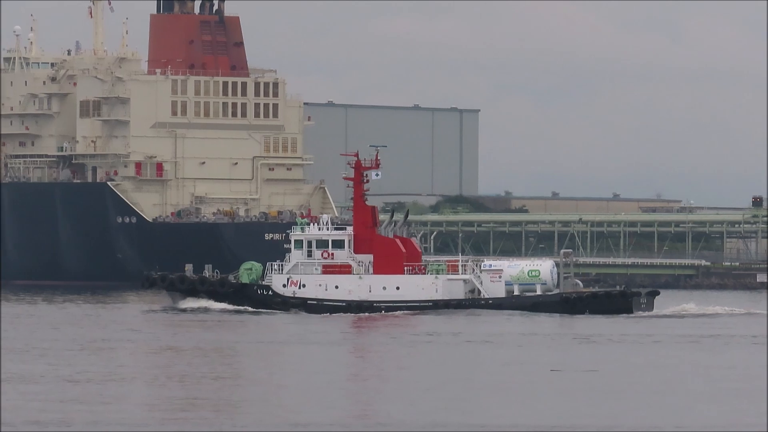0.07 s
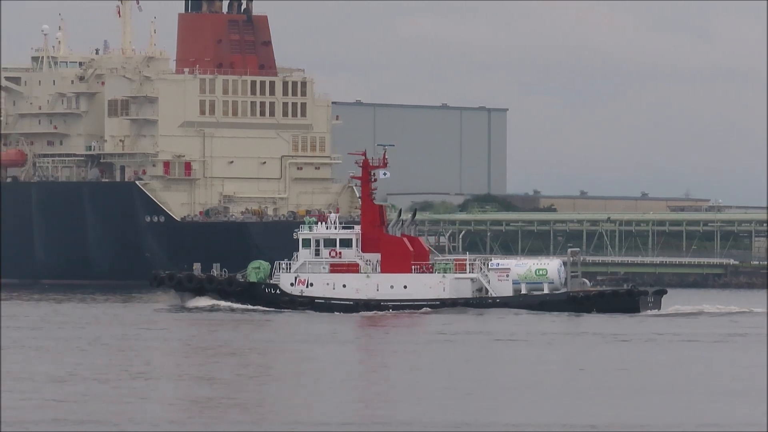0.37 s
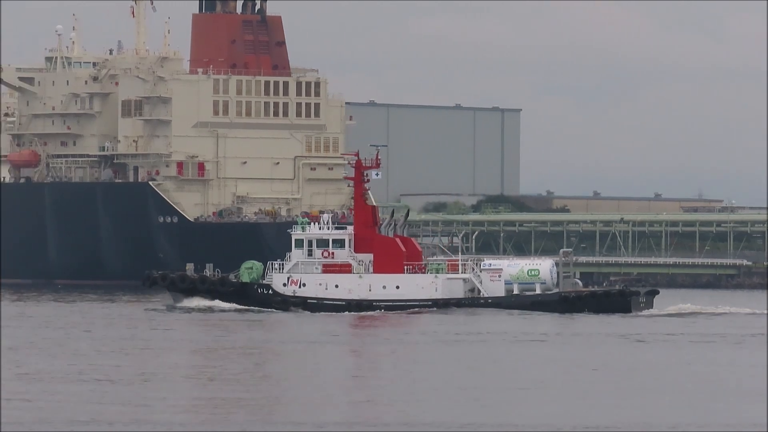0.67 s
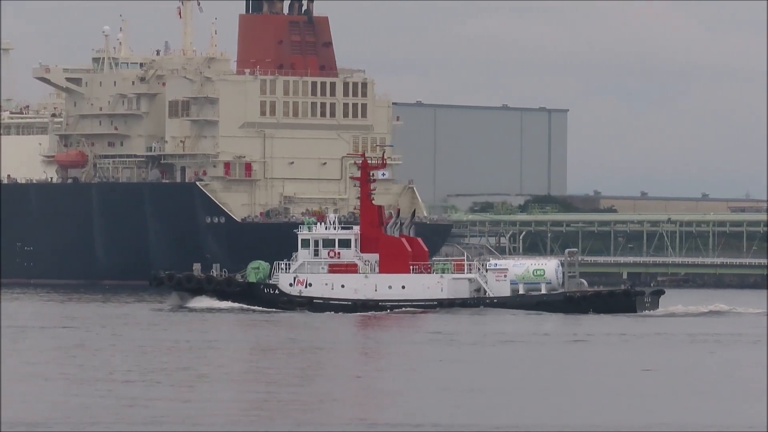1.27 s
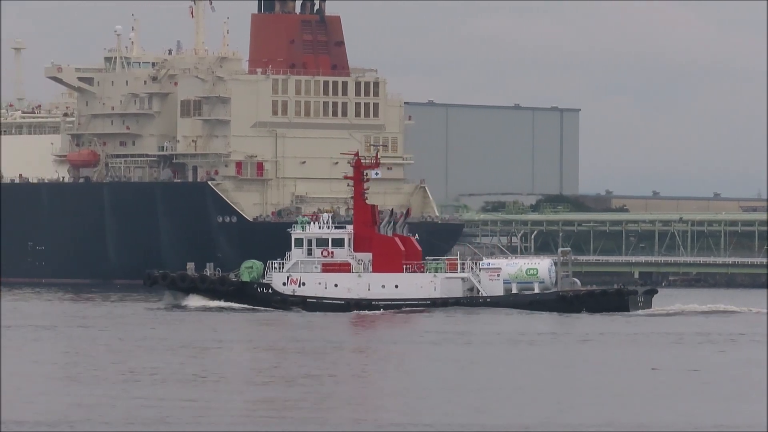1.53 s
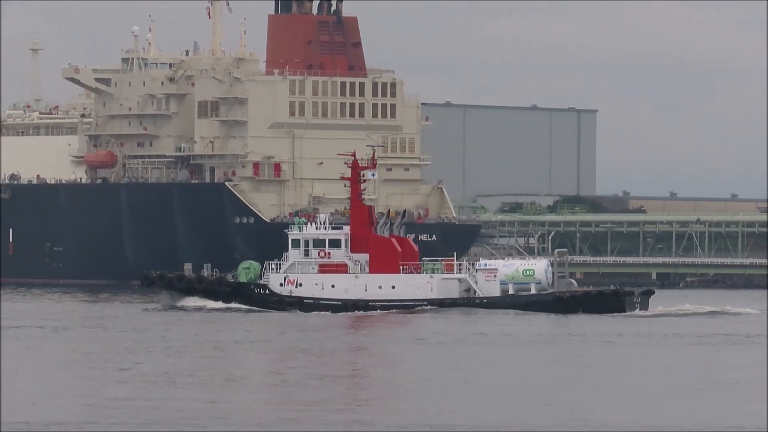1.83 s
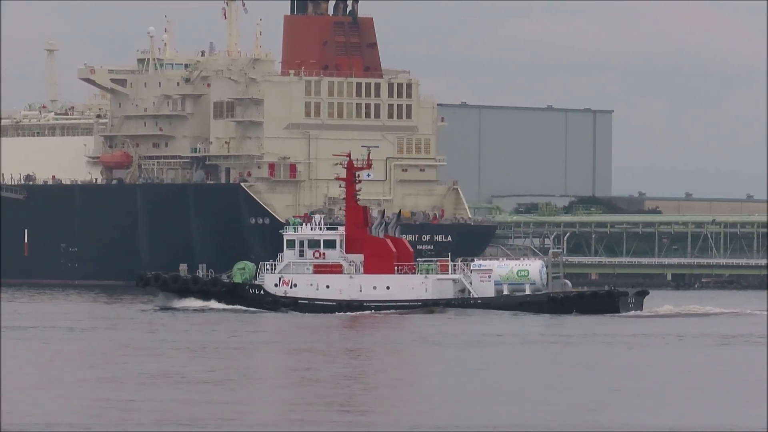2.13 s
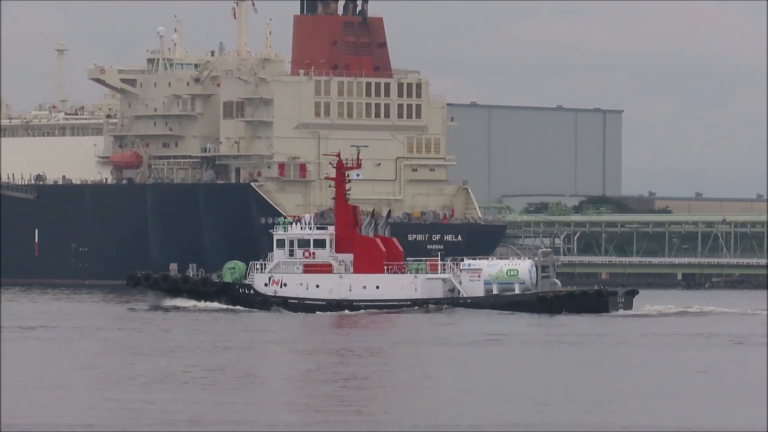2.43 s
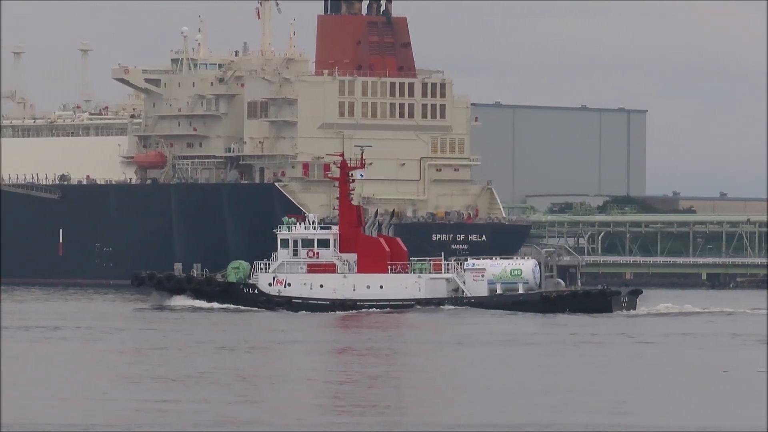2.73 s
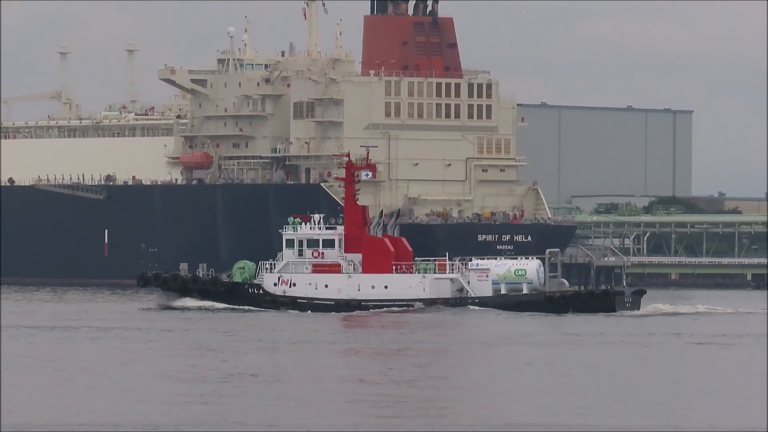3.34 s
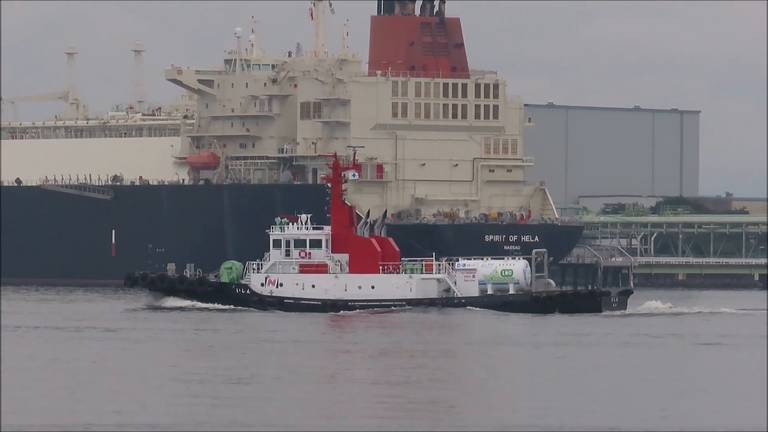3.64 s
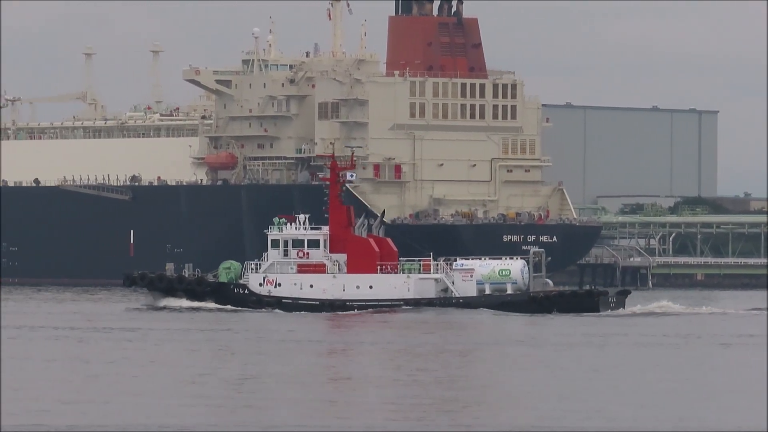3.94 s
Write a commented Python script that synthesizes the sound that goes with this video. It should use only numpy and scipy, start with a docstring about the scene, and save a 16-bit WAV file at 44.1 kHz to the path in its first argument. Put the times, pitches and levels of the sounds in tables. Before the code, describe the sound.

A distant tugboat's diesel engines rumble and drone throughout, with a slow pulse, loudest in the first 1.5 seconds and then gradually easing. Soft wind and water hiss fades along with them. Nearby wavelets plop and splash, mostly in the first second and again around 3.3 seconds. Small birds trill faintly until about 1.1 seconds and again near 3.7, with thin peeps in between.

```python
"""A tug crosses a harbour far away: its diesels rumble and drone, and its twin exhausts, slightly
out of tune, beat slowly against each other. Wind and the wash of the port hiss behind it, and
everything slowly eases off. At the near bank, wavelets plop (ringing bubbles) and splash (short
bursts of noise), and small birds chirp faintly in falling whistles."""
import sys
import numpy as np
from scipy import signal
from scipy.fft import rfft, irfft, next_fast_len
from scipy.io import wavfile
from scipy.ndimage import uniform_filter1d, map_coordinates

SR = 44100
rng = np.random.default_rng(int(sys.argv[2]) if len(sys.argv) > 2 else 0)


def to_wav(s):
    """Save 16-bit WAV."""
    ch = np.atleast_2d(s).T  # columns
    pcm = np.round(np.clip(ch, -1, 1) * 32767)  # PCM
    wavfile.write(sys.argv[1], SR, pcm.astype(np.int16))


N = 176400


def amp(db):
    """Turn decibels into a gain."""
    return 10 ** (np.asarray(db) / 20)


def unit(x):
    """Scale a sound to an average (rms) level of 1."""
    return x / np.sqrt(np.mean(x ** 2) + 1e-20)


def along(points, hz):
    """Read between (frequency [Hz], value) points on a log frequency axis."""
    freqs, values = np.transpose(points)
    return np.interp(np.log(hz + 1), np.log(freqs + 1), values)


def curve(rows):
    """Join (time [s], value) points with straight lines, one value per sample."""
    return np.interp(np.arange(N) / SR, *np.transpose(rows))


def wobble(rate):
    """A smooth curve through `rate` random values a second."""
    return map_coordinates(rng.standard_normal(512), [np.arange(N) * rate / SR + 2], mode="wrap")


def filtered(x, response):
    """Give each frequency in x the gain response(hz)."""
    size = next_fast_len(N + SR // 2)
    return irfft(rfft(x, size) * response(np.fft.rfftfreq(size, 1 / SR)), size)[..., :N]


def rush(spectrum, patchy_db):
    """Stereo noise with random louder and softer patches, mono in the bass and wide in the treble."""
    # how alike left and right are (frequency [Hz], likeness [0 to 1])
    likeness = [(100, 1), (180, .99), (350, 0.93), (700, 0.95), (1400, 0.81), (2800, 0.45), (5600, 0.29),
                (11000, 0.032)]
    bands = signal.stft(rng.standard_normal((2, N)), nperseg=512)[2]
    patches = uniform_filter1d(rng.standard_normal(bands.shape[1:]), size=5, axis=0)
    patches = uniform_filter1d(patches, size=10, axis=1)
    pair = signal.istft(bands * amp(patchy_db * unit(patches)), nperseg=512)[1][:, :N]

    def mid_side_gains(hz):
        angle = np.arccos(np.clip(along(likeness, hz), -1, 1)) / 2
        return amp(along(spectrum, hz)) * [np.cos(angle), np.sin(angle)]

    mid, side = filtered(pair, mid_side_gains)
    return unit(np.array([mid + side, mid - side]))


def add(out, start, sound, pan_db=0):
    """Mix a sound in at `start` seconds, leaning left by pan_db."""
    i = max(0, round(start * SR))
    part = out[:, i:i + sound.shape[-1]]
    part += (sound * amp([[pan_db / 2], [-pan_db / 2]]))[:, :part.shape[1]]


def whistles(notes, fall_hz, length_s):
    """A bird's short falling whistles, with a faint echo from the quay."""
    echo_db, echo_fade_s = -8, .25
    out, progress = np.zeros((2, N)), np.linspace(0, 1, int(length_s * SR))
    for start, top_hz, db in notes:
        phase = 2 * np.pi * np.cumsum(top_hz - fall_hz * progress) / SR
        add(out, start, amp(db) * np.sin(np.pi * progress) ** 2 * np.sin(phase))
    tail = rng.standard_normal((2, SR // 2)) * amp(-60 * np.arange(SR // 2) / SR / echo_fade_s)
    echo = signal.fftconvolve(out, tail / np.linalg.norm(tail[0]), axes=1)[:, :N]
    return out + amp(echo_db) * echo


def birds():
    """One bird trills, one gives thin peeps, and more twitter farther off."""
    # the two nearer birds' notes (time [s], starting pitch [Hz], peak level [dB])
    trill = [(.003, 4080, -56.5), (.07, 4050, -59), (.142, 4000, -59), (.215, 4000, -68), (.295, 3950, -69),
             (.39, 3850, -64), (.43, 3950, -62), (.635, 3900, -68), (.71, 4100, -65), (.77, 4080, -66),
             (.843, 4100, -61), (.91, 4120, -64), (.978, 4150, -63.5), (1.045, 4100, -62),
             (1.08, 3950, -66), (3.688, 4040, -67), (3.762, 4060, -65), (3.832, 4070, -63.5),
             (3.903, 4070, -62.5), (3.97, 4070, -63)]
    peeps = [(.132, 6270, -66), (.255, 6480, -70), (.58, 6300, -65), (.69, 6520, -70), (1.036, 6320, -68),
             (1.135, 6450, -71), (1.578, 6450, -70), (2.038, 6450, -70), (2.482, 6480, -69),
             (2.925, 6500, -70), (3.39, 6450, -75), (3.858, 6450, -74)]
    # loudness of the farther birds (time [s], level [dB])
    twitter_level = [(0, -79), (.5, -78), (.65, -70), (.85, -69), (1.1, -73), (1.3, -79), (1.8, -80),
                     (2.2, -82), (4, -90)]
    twitters_per_s, twitter_hz = 110, 3950
    chirp = dict(fall_hz=580, length_s=.046)
    starts = rng.random(int(twitters_per_s * N / SR)) * N / SR
    far_notes = [(start, twitter_hz * (1 + rng.normal(0, .055)), 0) for start in starts]
    twitter = amp(curve(twitter_level)) * unit(whistles(far_notes, **chirp))
    return twitter + whistles(trill, **chirp) + whistles(peeps, fall_hz=220, length_s=.033)


def bubble(hz, fade_s, jitter=0):
    """A bubble rings, dying by 60 dB in fade_s, and its pitch rises as it surfaces."""
    rise_per_s, attack_s = 4.1, .0022
    t = np.arange(SR // 10) / SR
    shape = amp(-60 * t / fade_s) * (1 - np.exp(-t / attack_s))
    return shape / shape.max() * np.sin(2 * np.pi * hz * t * (1 + rise_per_s * t / 2) + jitter)


def wash():
    """Wind and water hiss, dotted with a quieter fizz of tiny bubbles."""
    # loudness of the hiss (time [s], level [dB])
    level = [(0, -52), (.3, -51.5), (.7, -53), (1.5, -53.5), (2.5, -55.5), (3.4, -56), (4, -57)]
    # tone of the hiss (frequency [Hz], relative level [dB])
    spectrum = [(400, -4.5), (800, -14.5), (1150, 5), (1400, -1.5), (1700, -0.5), (2400, -7.5), (3100, -10),
                (3600, -12), (5000, -15.5), (7000, -20.5), (10000, -25), (12500, -30), (15000, -53)]
    bubbles_per_s, middle_hz, ring_cycles = 220, 2300, 13
    spread_octaves, spread_db, fizz_db = 2.5, 11, -12
    fizz = np.zeros((2, N))
    for when, pitch, strength, pan in rng.random((int(bubbles_per_s * N / SR), 4)):
        hz = middle_hz * 2 ** (spread_octaves * (pitch - .5))
        gain = amp(spread_db * strength ** 3) * (middle_hz / hz) ** .67  # low bubbles are louder
        add(fizz, when * N / SR, gain * bubble(hz, ring_cycles / hz), pan_db=10 * (pan - .5))
    loudness = amp(curve(level) + .19 * wobble(9))
    return loudness * (rush(spectrum, patchy_db=1.56) + amp(fizz_db) * unit(fizz))


def plops():
    """Wavelets and drops at the bank make single bubbles, each with a slightly rough ring."""
    # the bubbles (time [s], starting pitch [Hz], peak level [dB], time to fade by 60 dB [s])
    drops = [(.232, 3500, -57, .03), (.236, 1180, -43, 0.07), (.269, 2300, -51, .03),
             (0.297, 5200, -42, 0.0044), (.321, 2220, -51, 0.045), (0.568, 1340, -41.5, 0.027),
             (.646, 2520, -51.5, .03), (.842, 1240, -44, 0.035), (1.074, 1060, -45, 0.1),
             (1.633, 3050, -57, .03), (1.966, 3880, -59, .04), (2.035, 6350, -60, .015),
             (2.814, 2980, -56.5, .03), (3.335, 3120, -63, .02), (3.339, 727, -41.5, 0.11),
             (3.343, 1250, -51, .02), (3.438, 2450, -51.5, 0.018), (3.836, 1344, -42.5, 0.05)]
    out = np.zeros((2, N))
    for start, hz, db, fade_s in drops:
        jitter_rad = .36 * wobble(590)[:SR // 10]
        add(out, start, amp(db) * bubble(hz, fade_s, jitter_rad), pan_db=rng.normal(-1, 2.9))
    return out


def splashes():
    """Wavelets throw up spray: short bursts of noise, each around its own pitch."""
    # the bursts (time [s], level [dB], centre [Hz], width [octaves], time to fade by 60 dB [s])
    bursts = [(0.015, -54, 2700, 0.45, 0.053), (.231, -55, 2900, 0.41, .05), (.269, -50, 2360, .2, 0.026),
              (0.296, -49.5, 2300, .4, 0.062), (.298, -51, 4900, .2, 0.0078), (.566, -51, 2200, 0.93, .055),
              (0.624, -61, 4000, 0.5, .08), (1.381, -52, 2100, 0.32, 0.046), (1.563, -54, 1900, .35, 0.037),
              (1.636, -64, 6500, .5, .01), (2.035, -64, 5800, .35, .025), (2.646, -69, 8000, .5, .02),
              (3.247, -50, 5400, 0.55, 0.0069), (3.335, -48, 1900, 0.73, .017),
              (3.342, -42.5, 950, 0.37, 0.028), (3.448, -70, 10000, .45, .025)]
    attack_s = .0015
    out, t = np.zeros((2, N)), np.arange(SR // 8) / SR
    octave = np.log2(np.fft.rfftfreq(len(t), 1 / SR) + 1)
    for start, db, hz, width, fade_s in bursts:
        noise = rng.standard_normal(len(t)) + .43 * rng.standard_normal((2, len(t)))  # mostly mono
        band = np.exp(-.5 * ((octave - np.log2(hz)) / width) ** 2)
        spray = unit(irfft(rfft(noise) * band, len(t)))
        shape = amp(-60 * t / fade_s) * (1 - np.exp(-t / attack_s))
        add(out, start, amp(db) * spray * shape / shape.max())
    return out


def engine_tone(hz, wander_rate):
    """One engine hum at an average (rms) level of 1, its pitch wandering a little."""
    phase = 2 * np.pi * (hz * np.arange(N) / SR + rng.random())
    return np.sqrt(2) * np.sin(phase + .39 * wobble(wander_rate))


def engine_drone():
    """The diesels hum on many tones, each fading in and out over the water."""
    # the tones (pitch [Hz], level at the start [dB], level at the end [dB])
    tones = [(25.5, -37.5, -49), (44.2, -40.5, -41.5), (60.16, -38.5, -41.5), (65.1, -53, -44),
             (76.34, -40, -46.5), (118.5, -47.5, -49.5), (180.1, -43.5, -52.5), (241, -52.5, -52),
             (425, -57, -62.5), (494, -64, -62), (683.6, -61, -62)]
    fading_db = 1.5
    drone = np.zeros(N)
    for hz, first_db, last_db in tones:
        level_db = np.linspace(first_db, last_db, N) + fading_db * wobble(3.16)
        drone += amp(level_db) * engine_tone(hz, wander_rate=3.014)
    return drone


def engine_throb():
    """Two strong, low engine tones throb against each other ten times a second."""
    # the two tones (pitch [Hz], relative level [dB])
    tones = [(89.77, 1.5), (99.77, -1)]
    # loudness of the throb (time [s], level [dB])
    level = [(0, -37), (.4, -35.5), (1, -36.5), (1.5, -39.5), (2.1, -48), (2.65, -40), (3.2, -42.5),
             (4, -44)]
    return amp(curve(level)) * sum(amp(db) * engine_tone(hz, wander_rate=3.07) for hz, db in tones)


def twin_exhausts():
    """Two exhaust notes, almost the same pitch, slip in and out of step and so swell and sink."""
    note_hz, beat_hz, in_step_s = 157.3, 1.634, 1.942
    first_db, second_relative_db = -40.5, -3
    t = np.arange(N) / SR
    phase = 2 * np.pi * note_hz * t + .52 * wobble(2.17)
    second = amp(second_relative_db) * np.sin(phase + 2 * np.pi * beat_hz * (t - in_step_s))
    return np.sqrt(2) * amp(first_db) * (np.sin(phase) + second)


def engine_noise():
    """The tug's exhaust makes a deep rumble and its machinery a higher roar."""
    # loudness of each (time [s], level [dB])
    rumble_level = [(0, -29), (.4, -31), (1.2, -31.5), (2, -34), (2.7, -34.5), (3.3, -35), (4, -42.5)]
    roar_level = [(0, -38.5), (.5, -39), (1.3, -40), (2.2, -41.5), (3.2, -42.5), (4, -44.5)]
    # tone of each (frequency [Hz], relative level [dB])
    rumble_spectrum = [(10, -56), (17, -43), (22, 4), (31, -11), (43, 0.5), (70, 1.5), (125, 1), (165, -4),
                       (205, -8), (300, -29.5), (600, -76.5)]
    roar_spectrum = [(100, -22.5), (180, -0.5), (245, -1.5), (312, -3.5), (345, -8), (425, -5), (520, -9),
                     (690, -12.5), (790, -15.5), (920, -13.5), (1400, -37.5), (3000, -59)]
    rumble = amp(curve(rumble_level)) * rush(rumble_spectrum, patchy_db=-1.5)
    roar = amp(curve(roar_level)) * rush(roar_spectrum, patchy_db=.69)
    return rumble + roar


def scene():
    """The far tug in the middle, the wash a little to the right, plus wavelets and birds."""
    tug = engine_drone() + engine_throb() + twin_exhausts() + engine_noise()
    return tug + wash() * amp([[-.25], [.25]]) + plops() + splashes() + birds()


def record(dry):
    """Cut off the very highest treble."""
    return filtered(dry, lambda hz: hz < 15700)


dry = scene()
out = record(dry)
to_wav(out)
```